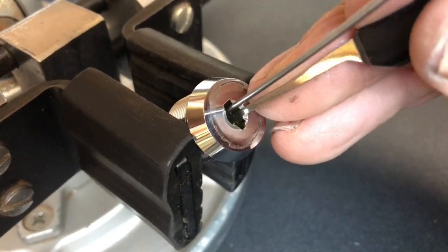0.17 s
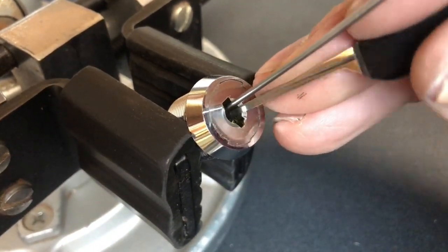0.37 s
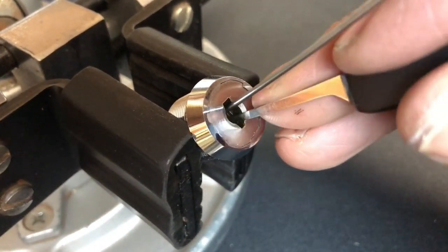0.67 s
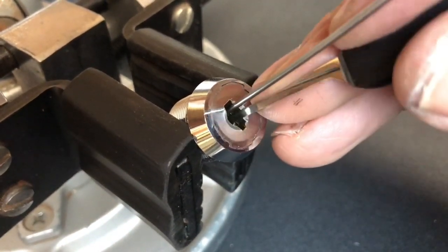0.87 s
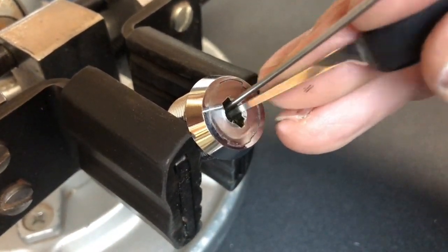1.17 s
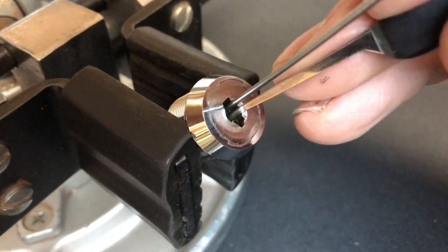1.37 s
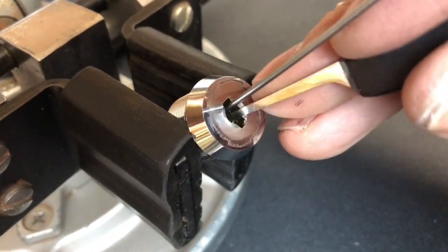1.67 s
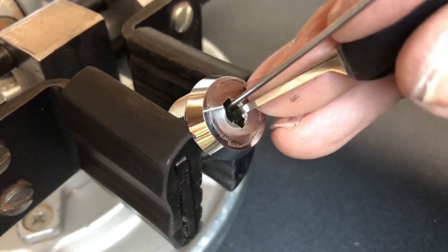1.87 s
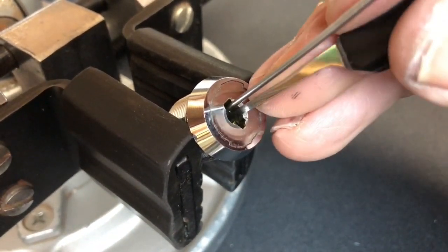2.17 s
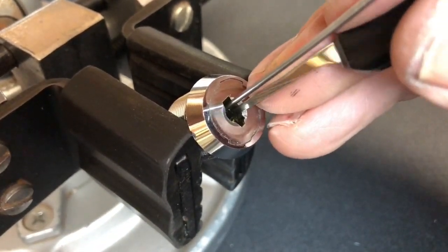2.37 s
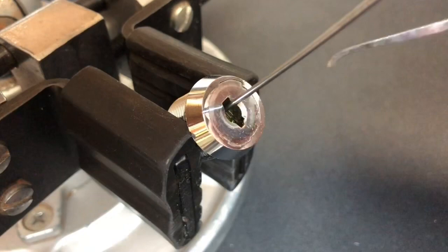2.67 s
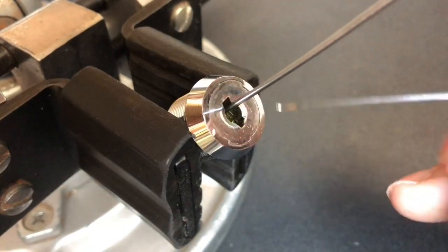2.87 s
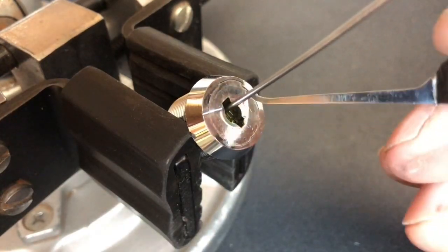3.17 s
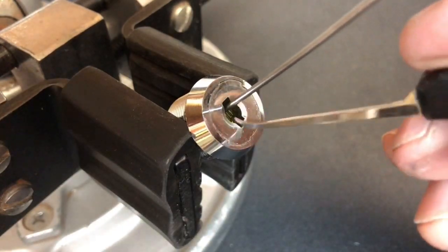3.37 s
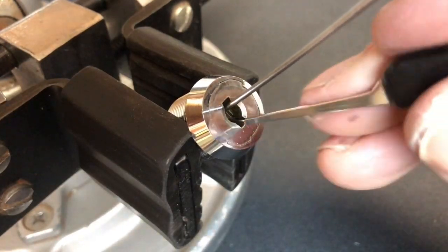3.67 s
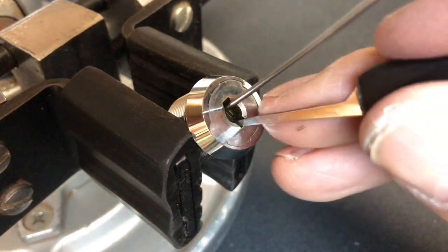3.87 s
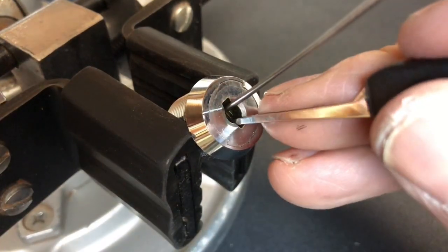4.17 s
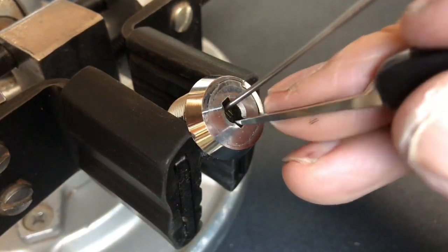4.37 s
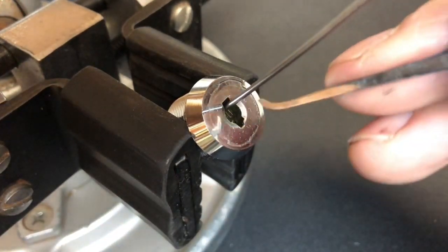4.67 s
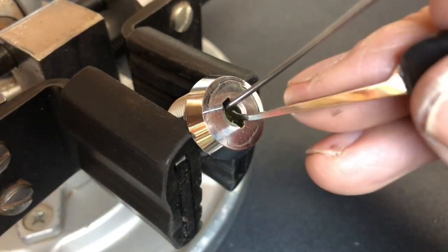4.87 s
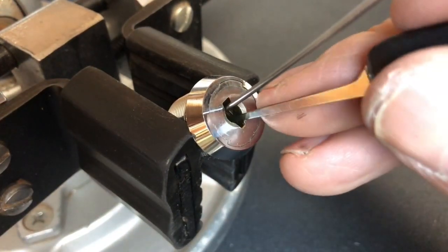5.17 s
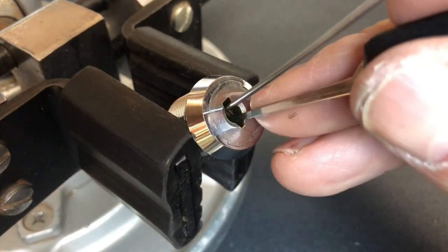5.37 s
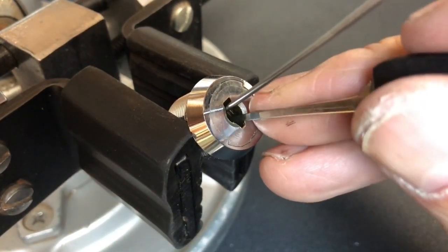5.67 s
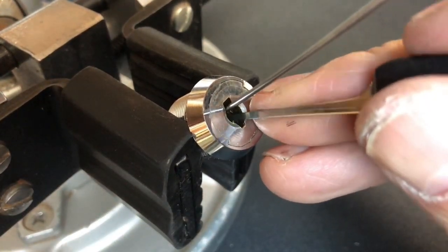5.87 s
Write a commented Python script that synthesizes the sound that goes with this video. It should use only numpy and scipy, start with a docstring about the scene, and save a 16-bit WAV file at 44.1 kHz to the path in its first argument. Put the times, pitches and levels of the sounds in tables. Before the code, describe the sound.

Sparse small metallic clicks and ticks of a steel pick in a brass lock, two sharp loud snaps, faint scrapes, low hum beneath.

```python
"""Picking a small brass lock

A steel pick works the pins of a small brass lock held in a vise, close to the microphone.
Pins click and snap: short chatters of contacts ring the modes of the lock, and the blade pings.
The pick scrapes along the keyway as dense uneven grains, and squeaks as friction drives single modes.
Loose pins rattle and the vise grumbles after each click; echoes return from bench and walls.
A quiet room lies below: unsteady rumble, an uneven low hum, steady hiss and a thin whine."""
import sys
import numpy as np
from scipy import signal
from scipy.fft import rfft, irfft, next_fast_len
from scipy.io import wavfile

SR = 44100
rng = np.random.default_rng(int(sys.argv[2]) if len(sys.argv) > 2 else 0)


def master(y):
    """Save y as 16-bit WAV."""
    cut = np.clip(np.atleast_2d(y).T, -1, 1)
    pcm = np.round(cut * 32767)  # scale
    wavfile.write(sys.argv[1], SR, pcm.astype(np.int16))


N = 265658

# Clicks of pick and pins. Each row: start in seconds, nominal level in dB, thud into the vise in dB,
# brightness (tilt from low ring to top ring) in dB, ping of the blade in Hz, ping over the level in dB.
CLICK_EVENTS = [(.4625, -38.5, -30, -6, 3100, -15), (0.4655, -30.5, -23, 1.5, 12900, -8),
                (0.5207, -44, -7, -2, 2000, -2.5), (.6311, -34.5, -19.5, 26, 5470, -2.5),
                (0.6744, -55.5, -2, 10, 3530, -3), (0.688, -43.5, -35, -8, 7270, -4.5),
                (0.739, -51, -10, 7, 13000, -15), (0.7598, -45.5, -15, 9, 6950, -10),
                (.838, -30.5, -26.5, -2, 3230, -30), (0.9754, -53.5, -18, 6, 7030, 1),
                (1.1766, -33.5, -19.5, 10, 7540, -8.5), (1.2634, -10.5, -41.5, 7, 7830, -7.5),
                (1.2907, -44, -23, -5, 7640, -4), (1.3227, -51.5, -14, -7, 6650, -1),
                (1.602, -52, -27, 2, 3130, -4), (1.6745, -40, -38, -4, 6600, -20),
                (1.681, -43, -2, -6, 3060, -11), (1.849, -29.5, -20.5, 6.5, 7170, -8),
                (2.0026, -52.5, -4, 7, 2990, -9), (2.5382, -45.5, -20, 4, 7860, -15),
                (2.5603, 0.5, -70, 7.5, 6600, -14), (2.5859, -37, -27.5, 26, 8200, -7),
                (2.6466, -40.5, -30, -3, 4620, -20), (2.752, -48.5, -34.5, 19, 7220, -9),
                (3.1477, -30, -51.5, 13, 12950, -3), (3.1534, -42, -40.5, 12, 7860, 2),
                (3.163, -37, -35, -3, 7650, 1), (3.1728, -36, -33, -3, 7850, -2),
                (3.2148, -37, -45, 14, 7810, -4), (3.2264, -28.5, -31, 18, 6300, -5),
                (3.3217, -34.5, -45, 0.5, 11800, -7), (3.3458, -32, -42, 11, 11900, -15),
                (3.4266, -38.5, -46, 10, 5540, -9), (3.4315, -35, -38, 2, 6960, -12),
                (3.469, -39, -42, 5, 11800, -4), (3.473, -26.5, -34, 13, 11800, -3.5),
                (3.4816, -37.5, -26, -8, 6530, -3), (3.568, -37.5, -29, 9, 4550, -8),
                (3.5756, -37.5, -25.5, 10, 7000, -13), (3.6093, -45.5, -20, 2, 4480, 9.5),
                (3.6139, -37.5, -15, 19, 8050, 5), (3.7594, -47, -12, 4.5, 2190, -5),
                (3.9906, -49.5, -10, 9, 3640, -7.5), (4.0072, -42.5, -11, 17.5, 3940, -1),
                (4.0119, -31.5, -19, 3, 13100, -11), (4.1342, -49, -9, -3, 2930, -16),
                (4.278, -57, -3, -8, 2990, -9.5), (4.349, -53.5, -5.5, -3.5, 4530, -10.5),
                (4.37, -57.5, -11, -3.5, 4300, -6.5), (4.4532, -20.5, -30, 23.5, 13760, -4),
                (4.498, -51, -23.5, 5.5, 3020, -10), (4.5112, -42.5, -24, 2, 3580, 2),
                (4.523, -39, -38, -6, 12500, -7), (4.942, -43.5, -32.5, 7, 7020, -8),
                (4.953, -44, -29.5, 10, 7600, -16.5), (5.203, -36, -21.5, 17, 5120, -12),
                (5.782, -49, -2, -1, 3160, -6), (5.8006, -26, -20, -10.5, 7720, -9)]
# Modes of lock, keyway and vise. Each row: pitch in Hz, width in Hz, relative level in dB.
LOCK_MODES = [(347, 76, -7.5), (485.5, 37, -11), (607, 56, -10), (837.5, 120, -6), (1147, 160, -5),
              (1556, 295, -2.5), (2002, 130, -10), (2580, 280, -4), (3302, 380, 0), (3890, 380, -10),
              (4656, 480, -9), (5770, 460, -9), (6600, 620, -3.5), (7850, 850, -1), (8950, 700, -13.5),
              (9920, 550, -11), (11540, 810, -1.5), (13100, 710, -2), (14200, 600, -16.5),
              (15100, 500, -13)]


def from_db(db):
    """dB to gain."""
    return 10 ** (np.asarray(db) / 20)


def rms_one(x):
    """Scale to rms 1."""
    return x / np.sqrt(np.mean(x ** 2) + 1e-20)


def at_hz(points, hz):
    """Read a spectrum in dB on a log frequency axis."""
    point_hz, point_db = np.array(points).T
    return np.interp(np.log(hz), np.log(point_hz), point_db)


def drift(rate_hz):
    """Slow random wander of rms about 1: noise through two equal low-pass poles, on every 40th sample."""
    pole = np.exp(-80 * np.pi * rate_hz / SR)
    noise = rng.standard_normal(N // 40 + 2002)
    slow = signal.lfilter([1], [1, -2 * pole, pole * pole], noise)[2000:]   # drop the settling
    return np.interp(np.arange(N) / 40, np.arange(len(slow)), rms_one(slow))


def ring(force, hz, width_hz):
    """One mode: a unit blow starts a decaying sine of height near 1, softly band-limited around its pitch."""
    radius, angle = np.exp(-np.pi * width_hz / SR), 2 * np.pi * hz / SR
    poles = [1, -2 * radius * np.cos(angle), radius * radius]
    rung = signal.lfilter([0, np.sin(angle)], poles, force + 1e-18)
    band_hz = [hz / 1.4, min(hz * 1.4, .45 * SR)]
    return signal.lfilter(*signal.butter(1, band_hz, "band", fs=SR), rung)


def swell(count, edge):
    """Soft rise and fall that together take the given share of the length."""
    return signal.windows.tukey(count, np.clip(edge, 0, 1))


def room_noise():
    """Unsteady rumble, an uneven low hum near 108 Hz and wavering hums, over steady hiss and a thin whine."""
    # Spectrum of the room. Each row: frequency in Hz, relative density in dB.
    room_spectrum = [(12, -55), (20, -18), (38, -1.5), (70, -2), (106, -10.5), (282, -21), (342, -25.5),
                     (439, -29.5), (478, -29.5), (565, -33), (1070, -37), (1160, -37.5), (2470, -43.5),
                     (8640, -46), (15500, -51.5)]
    # Uneven low hum near 108 Hz. Each row: time in seconds, level in dB rms.
    hum_levels = [(0, -57), (.7, -57.5), (1.05, -64), (1.4, -57), (1.75, -60), (2.1, -55), (2.38, -55),
                  (2.47, -63.5), (2.6, -54), (3.2, -56), (3.4, -61.5), (3.9, -67), (4.1, -62.5),
                  (4.7, -68.5), (5.2, -60), (6.02, -59.5)]
    # Wavering hums over the rumble. Each row: pitch in Hz, width in Hz, level in dB rms.
    wavering_hums = [(163.5, 17, -72), (481.8, 15, -88)]
    # Thin steady tone. Each row: pitch in Hz, level in dB rms.
    whine_tones = [(1105, -87.5)]
    rumble_db, rumble_follows = -68.5, .4   # rumble at mean hum; share of the hum's unevenness in dB
    hiss_db, waver_db = -66.5, 2.0

    t = np.arange(N) / SR
    hum_db = np.interp(t, *np.transpose(hum_levels))
    hz = np.maximum(np.arange(N // 2 + 1) * SR / N, 1)
    noise = rfft(rng.standard_normal(N)) * from_db(at_hz(room_spectrum, hz))
    low_share = 1 / (1 + (hz / 200) ** 4)   # power that goes to the rumble, the rest is hiss
    rumble = rms_one(irfft(noise * np.sqrt(low_share), N))
    hiss = rms_one(irfft(noise * np.sqrt(1 - low_share), N))

    uneven_db = rumble_follows * (hum_db - hum_db.mean())
    rumble = from_db(rumble_db + uneven_db + 2.7 * drift(2.5)) * rumble
    white = rng.standard_normal((2, N))
    hum = from_db(hum_db) * rms_one(ring(white[0], 108.6, 21))
    hums = sum(from_db(db + waver_db * drift(1.0)) * rms_one(ring(white[1], pitch_hz, width_hz))
               for pitch_hz, width_hz, db in wavering_hums)
    whine = sum(from_db(db) * np.sqrt(2) * np.sin(2 * np.pi * tone_hz * t) for tone_hz, db in whine_tones)
    return rumble + hum + hums + from_db(hiss_db) * hiss + whine


def steel_on_brass():
    """Dense uneven grains ring the modes, damped by contact; returns vise, low and bright parts."""
    grains_per_s, grain_spread_db = 4500, 3.8   # roughness of steel on brass
    top_db = -4.5   # treble against the middle modes
    sizes = from_db(grain_spread_db * np.minimum(rng.exponential(1, N), 5)) * rng.choice([-1, 1], N)
    grains = sizes * (rng.random(N) < grains_per_s / SR) * from_db(2.2 * drift(90))
    parts = []
    for low_hz, high_hz in ((0, 1400), (1400, 4300), (4300, 9000), (9000, 20000)):
        part = np.zeros(N)
        for k, (hz, width_hz, db) in enumerate(LOCK_MODES):
            if low_hz < hz < high_hz:
                damping = 2.6 if hz > 700 else 1
                part += (-1) ** k * from_db(db) * ring(grains, hz, width_hz * damping)
        parts.append(rms_one(part))
    vise, low, middle, top = parts
    return vise, low, middle + from_db(top_db) * top


def strokes(vise, low, bright):
    """The pick drags along the keyway: pressure lets the grain noise through, weight adds low ring and vise."""
    # Strokes of the pick. Each row: start in seconds, end in seconds, level of the middle modes in dB,
    # rise over the stroke in dB, weight into the vise in dB.
    pick_strokes = [(0.368, 0.501, -78, -10, 16.5), (0.53, 0.657, -77, 12, 8),
                    (0.827, 0.938, -83.5, -7, 20), (1.08, 1.165, -89, -6, 17),
                    (1.168, 1.211, -73, -7, 15.5), (1.237, 1.277, -65, 15, 5), (1.267, 1.329, -61.5, -2, 1),
                    (1.51, 1.73, -76.5, -7, 2.5), (1.827, 1.877, -75, 5, 11), (2.566, 2.628, -52, 6, -7.5),
                    (2.608, 2.63, -43.5, 2, -12.5), (2.615, 2.67, -62, -20, -9), (2.728, 2.779, -71, 1, -7),
                    (2.757, 2.854, -70.5, -0.5, -5.5), (2.831, 2.91, -69, 0, -13),
                    (2.889, 3.045, -73, -0.5, -9), (3.02, 3.12, -83, -2, -7), (3.088, 3.189, -67, 16, -12),
                    (3.167, 3.244, -66, 23, -4), (3.27, 3.361, -61, 26.5, -6.5), (3.352, 3.43, -82, -4, -6),
                    (3.488, 3.553, -76, -15, -6), (3.533, 3.697, -67, -8, -6.5),
                    (3.66, 3.805, -76.5, 8, -6.5), (3.778, 3.928, -73, 2.5, -0.5),
                    (3.986, 4.027, -59.5, 13.5, 4.5), (4.339, 4.378, -80, -8, 7),
                    (4.397, 4.421, -73.5, -4, 3), (4.478, 4.53, -67, 6, -0.5), (4.512, 4.556, -61, 4, -5),
                    (5.019, 5.122, -77, -4, -6.5), (5.779, 5.82, -77, -12, 18)]
    low_db, low_follows = -5, 0.73   # low ring at no weight; share of the weight that it follows
    vise_db = -3.5   # vise over the weight put into it
    out = np.zeros(N)
    for start, end, level_db, rise_db, weight_db in pick_strokes:
        span = slice(round(start * SR), round(end * SR))
        count = span.stop - span.start
        pressure = from_db(level_db + rise_db * np.linspace(-.5, .5, count)) * swell(count, edge=0.84)
        low_part = from_db(low_db + low_follows * weight_db) * low[span]
        vise_part = from_db(vise_db + weight_db) * vise[span]
        out[span] += pressure * (bright[span] + low_part + vise_part)
    return out


def echoes(x):
    """Ten feedback delays off bench and walls, duller on every round."""
    t60_s, wall_cut_hz = 0.065, 15000   # decay before the dulling; low-pass on each round
    size = next_fast_len(N + SR)
    w = 2 * np.pi * np.arange(size // 2 + 1) / size
    dull = 1 / (1 + 1j * w * SR / (2 * np.pi * wall_cut_hz))
    answer = 0
    for k, lag_s in enumerate(rng.uniform(0.0026, .02, 10)):
        loop = from_db(-60 * lag_s / t60_s) * dull * np.exp(-1j * w * round(lag_s * SR))
        answer = answer + (-1) ** k * loop / (1 - loop)   # the sum of all rounds
    return irfft(rfft(x, size) * answer, size)[:N]


def clicks():
    """Each click is a short chatter of contacts that strikes every mode, coloured by where it lands."""
    # Pitches in Hz of thud, low ring, middle ring and top ring.
    ring_hz = [600, 3000, 6800, 12500]
    outer_ring_db, middle_ring_db = -17.5, -12.5   # low and top ring before brightness; middle ring
    chatter_ms, chatter_spread = .66, .1   # median time to its height; spread of its logarithm
    ping_width_hz = 280
    rows = np.array(CLICK_EVENTS)
    t_ms = np.arange(400) * 1000 / SR
    chance = rng.standard_normal((len(rows), 401))
    length_ms = np.clip(chatter_ms * np.exp(chatter_spread * chance[:, :1]), .05, 4)
    shape = t_ms / length_ms * np.exp(-t_ms / length_ms)   # contacts swell, then die
    chatter = shape * chance[:, 1:]
    chatter = chatter / np.sqrt(np.sum(chatter ** 2, axis=1, keepdims=True))
    height = (length_ms[:, 0] * SR / 1000).astype(int)
    chatter[np.arange(len(rows)), height] = 2.2   # one firm contact at the height of the chatter
    at = (np.round(rows[:, :1] * SR).astype(int) + np.arange(400)).ravel()

    out = np.zeros(N)
    for hz, width_hz, mode_db in LOCK_MODES:
        colour_db = []
        for thud_db, bright_db in rows[:, 2:4]:
            ring_db = [thud_db, outer_ring_db - bright_db / 2, middle_ring_db, outer_ring_db + bright_db / 2]
            colour_db.append(np.interp(np.log(hz), np.log(ring_hz), ring_db))
        gain = from_db(rows[:, 1] + colour_db + mode_db + 7.0 + rng.normal(0, 0.89, len(rows)))
        # Divide by the chatter's strength at this pitch, so that every mode gets its due share of the blow.
        strength = np.abs(chatter @ np.exp(-2j * np.pi * hz * t_ms / 1000))
        gain = gain / np.maximum(strength, .5)
        force = np.bincount(at, (chatter * gain[:, None]).ravel(), N)
        out += ring(force, hz, width_hz)

    for s, level_db, *_, ping_hz, ping_db in CLICK_EVENTS:   # the free length of the blade sets its pitch
        start = round(s * SR)
        ping = ring(np.arange(2000) == 20, ping_hz, ping_width_hz)
        out[start:start + 2000] += from_db(level_db + ping_db) * ping
    return out


def rattle_and_grumble(vise, low, bright):
    """After every click loose pins rattle on and the heavy vise answers late, both as decaying grain noise."""
    rattle_db, rattle_t60_s = -29, 0.036   # against the click's level
    grumble_db, grumble_t60_s = -12.5, .14   # against its thud; decay before the soft edges
    grumble_delay_s, length_s = .006, 0.074
    after_s = np.arange(round(length_s * SR)) / SR
    out = np.zeros(N)
    for s, level_db, thud_db, *_ in CLICK_EVENTS:
        start = round(s * SR)
        span = slice(start, start + len(after_s))
        rattle = from_db(level_db + rattle_db - 60 * after_s / rattle_t60_s)
        out[span] += rattle * (bright[span] + from_db(-10.5) * low[span])
        late = round((s + grumble_delay_s) * SR)
        span = slice(late, late + len(after_s))
        grumble = from_db(level_db + thud_db + grumble_db - 60 * after_s / grumble_t60_s)
        out[span] += grumble * vise[span] * swell(len(after_s), edge=.3)
    return out


def squeaks():
    """The blade squeaks as it slides: uneven friction drives one narrow mode for each squeak."""
    # Each row: start in seconds, end in seconds, pitch in Hz, level in dB rms before the soft edges.
    blade_squeaks = [(1.55, 1.59, 6570, -72), (1.564, 1.653, 13000, -80), (2.609, 2.627, 6600, -47),
                     (2.637, 2.669, 1840, -70.5), (2.64, 2.669, 4600, -70), (2.737, 2.772, 2935, -78),
                     (2.762, 2.831, 12900, -71), (2.855, 3.025, 7420, -74), (2.863, 2.933, 14240, -67),
                     (2.85, 2.901, 2950, -79.5), (2.9, 2.94, 12900, -75), (2.901, 2.95, 4930, -81),
                     (3.13, 3.238, 7600, -61.5), (3.131, 3.193, 13100, -61.5), (3.147, 3.24, 6000, -66),
                     (3.16, 3.25, 3520, -72), (3.314, 3.361, 11800, -59), (3.278, 3.407, 5070, -74.5),
                     (3.35, 3.418, 7200, -77), (3.325, 3.412, 13100, -74), (3.468, 3.49, 4430, -56),
                     (3.587, 3.663, 5000, -70.5), (3.616, 3.674, 13900, -75), (3.8, 3.901, 13500, -77),
                     (5.798, 5.826, 4180, -61)]
    width_hz = 130
    rub = rng.standard_normal(N) * from_db(4.5 * drift(40))
    out = np.zeros(N)
    for start, end, hz, level_db in blade_squeaks:
        span = slice(round(start * SR), round(end * SR))
        tone = ring(rub[span], hz, width_hz)
        out[span] += from_db(level_db) * rms_one(tone) * swell(len(tone), edge=0.17)
    return out


def scene():
    """The lock close by, its echoes and the room."""
    echo_db = -17
    vise, low, bright = steel_on_brass()
    lock = strokes(vise, low, bright) + clicks() + rattle_and_grumble(vise, low, bright) + squeaks()
    return (lock + from_db(echo_db) * echoes(lock) + room_noise())[None]


def record(dry):
    """The microphone loses the deepest bass, and the top is cut steeply."""
    cutoff_hz = 16300   # 60 dB down from here up
    thin = signal.sosfilt(signal.butter(2, 33, "high", fs=SR, output="sos"), dry)
    return signal.sosfilt(signal.cheby2(18, 60, cutoff_hz, fs=SR, output="sos"), thin)


dry = scene()
out = record(dry)
master(out)
```